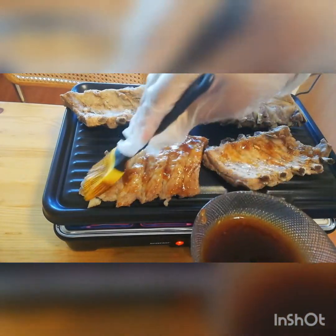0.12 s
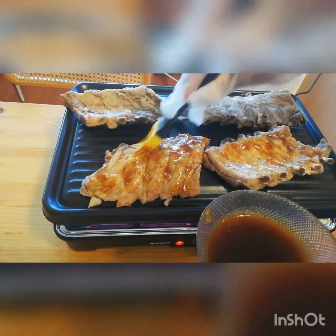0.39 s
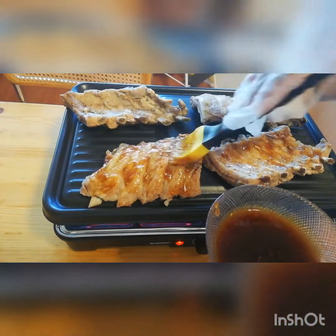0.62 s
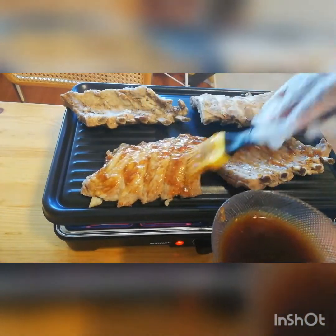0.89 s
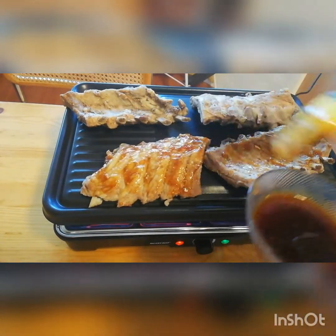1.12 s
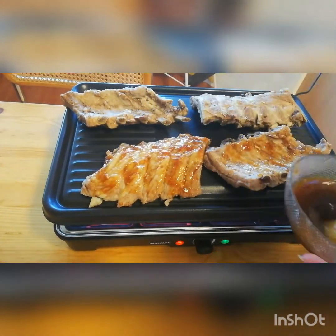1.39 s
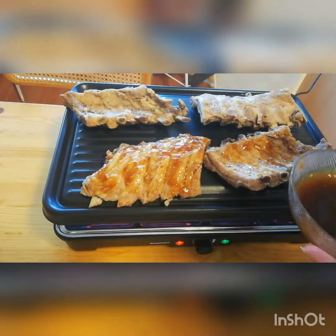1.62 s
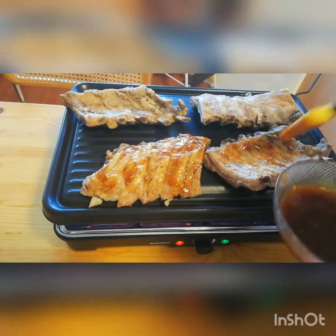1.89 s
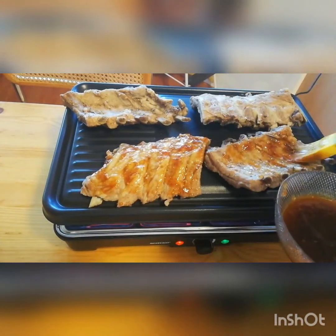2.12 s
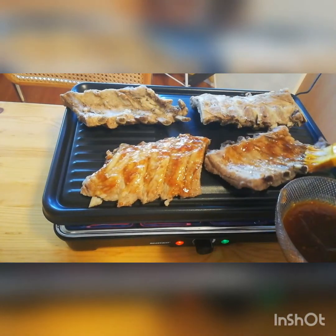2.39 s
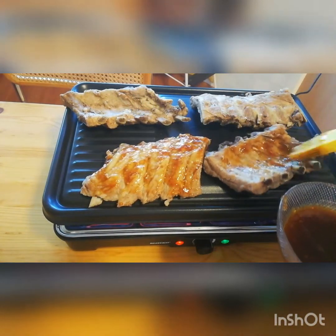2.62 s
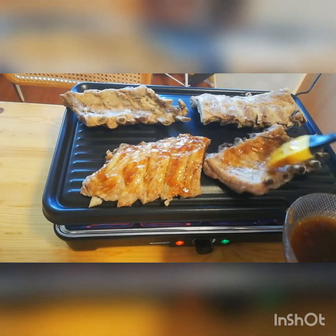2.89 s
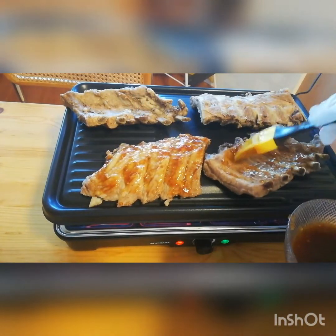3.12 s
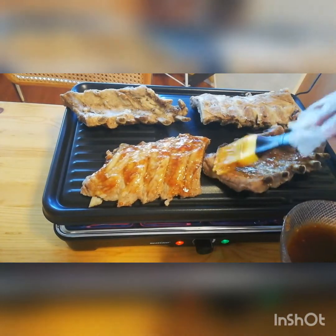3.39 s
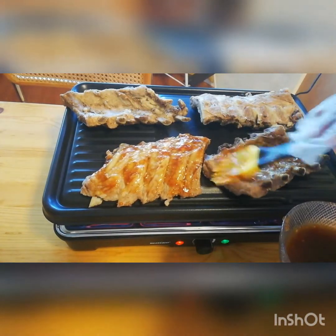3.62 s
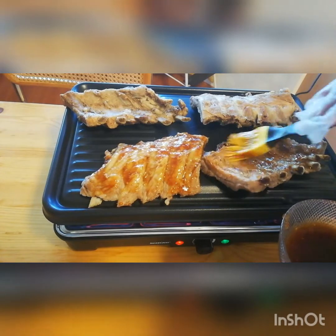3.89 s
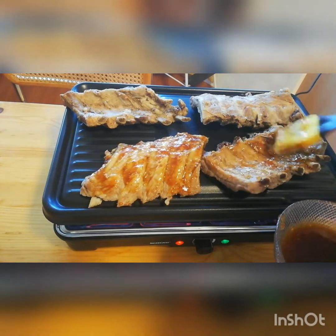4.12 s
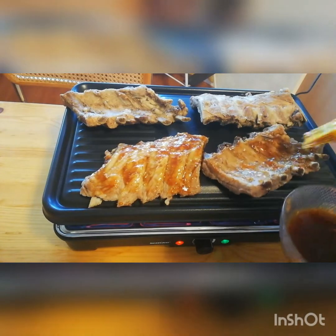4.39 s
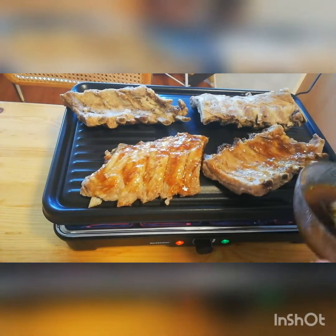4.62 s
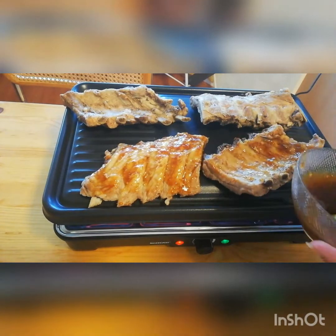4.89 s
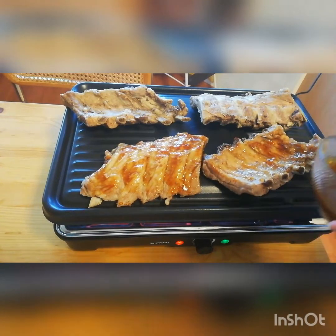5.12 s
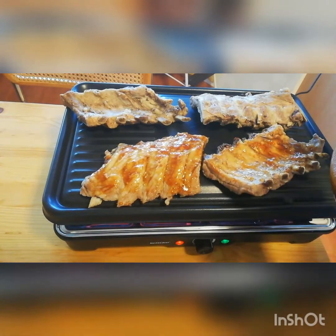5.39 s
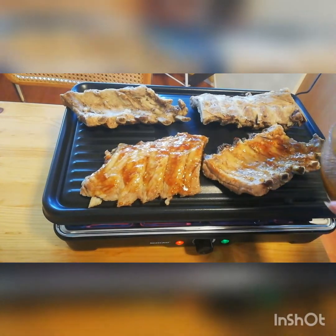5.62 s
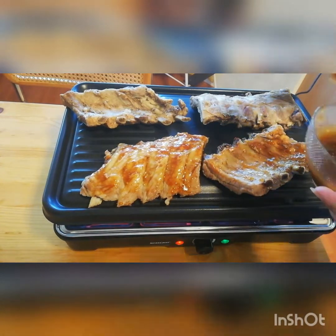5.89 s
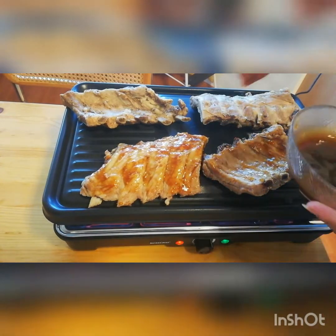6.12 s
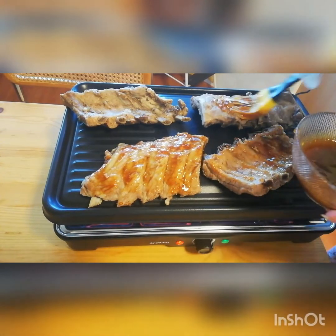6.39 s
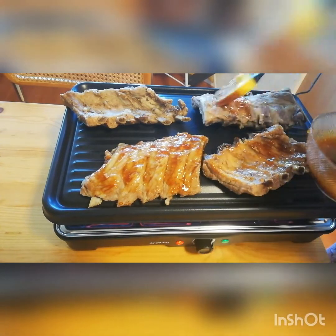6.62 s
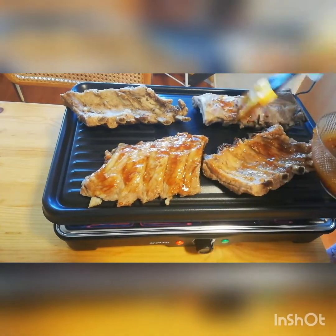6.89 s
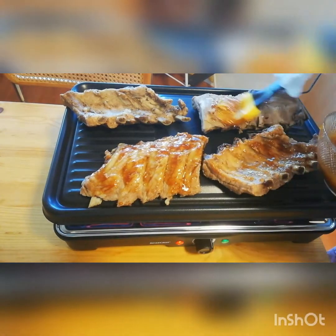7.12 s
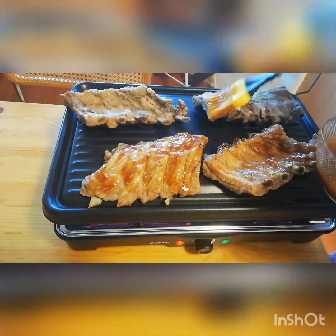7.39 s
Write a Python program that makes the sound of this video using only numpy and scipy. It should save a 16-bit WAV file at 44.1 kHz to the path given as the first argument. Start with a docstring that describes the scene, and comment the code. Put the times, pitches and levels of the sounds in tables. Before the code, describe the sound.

In a small home kitchen, heard in stereo from about half a metre, ribs fry with a bright, fine hiss and random crackle over soft fan noise and barely audible mains hum. Tiny squeaks come at 0.1-0.3 s, and the sizzle surges around 0.4 s with sharp fat pops. A hard, hollow spit snaps at 1.5 s. From 2 s a faint low rumble accompanies the moving bowl; a knock lands at 2.4 s, with pops and spits around it. Between 2.7 and 3.9 s frying flares crowd together, with muffled rubs and a swishy squeak. Around 4-5 s it is calmer, then small pops cluster from 5 s, with a strong one near 5.45 s. Short scrapes follow. From 6.3 s the hiss coarsens, grainy dragging continues, and woody knocks stand out near 6.4, 6.8 and 7.4 s, with squeaks around 7.2 s.

```python
"""Home kitchen, two-port phone half a metre from ribs on a ribbed electric grill plate.
Throughout, steam bubbles burst as coloured noise with random crackle, over shaped fan noise and mains hum.
Early on the hiss flares and fat pops as short filtered noise; near 1.5 s a hard spit rings a hollow.
From 2 s a low rumble, rubs and first knocks, rung from table modes, mark the sauce bowl; flares crowd 3-4 s.
After 5 s pops continue, the bowl and brush scrape as grainy noise, and most knocks come past 6 s."""
import sys
import numpy as np
from scipy import signal
from scipy.fft import rfft, irfft
from scipy.io import wavfile
from scipy.ndimage import uniform_filter1d

SR = 44100
rng = np.random.default_rng(int(sys.argv[2]) if len(sys.argv) > 2 else 0)


def volts(x):
    """Linear amplitude factor 10**(x/20) for a level x in dB, scalar or array-like."""
    e = np.asarray(x, float) / 20
    return 10 ** e


def to_wav(s):
    """Save 16-bit WAV."""
    ch = np.atleast_2d(s).T  # columns
    pcm = np.round(np.clip(ch, -1, 1) * 32767)  # PCM
    wavfile.write(sys.argv[1], SR, pcm.astype(np.int16))


N = 331191
T = np.arange(N) / SR  # seconds

# Levels and peaks are those of the direct sound, before port balance, room and the ports' treble.
# Colour of the fan and the far ribs: pitch_hz, relative_db
KITCHEN_COLOUR = [(12, -44), (20, -1.5), (48, -4), (93, -2.5), (285, 0), (347, -4), (499, -2.5),
                  (558, -7.5), (1000, -1.5), (1710, 0), (2140, -4.5), (2670, -7), (10500, 2), (16000, -80)]
# Wavering mains hum lines: pitch_hz, width_hz, level_db
HUM_LINES = [(100.6, 2.8, -73.5), (281.6, 6.1, -75)]
# Likeness of diffuse sound at the two ports: pitch_hz, correlation (-1 to 1)
PORT_LIKENESS = [(60, .99), (130, .97), (210, .92), (290, .65), (640, .1), (1400, .3), (3000, .05),
                 (15000, 0)]
# One low rumble while the bowl is moved: start_s, length_s, level_db, top_hz
BOWL_SHUDDER = (2, 1.5, -72, 55)
# Muffled rubs while the bowl is handled: start_s, length_s, level_db, centre_hz
BOWL_RUBS = [(2.838, 0.11, -63.5, 228), (3.298, 0.067, -64, 260), (3.446, .05, -63, 350),
             (3.586, 0.097, -66, 304), (4.548, .1, -64, 300), (5.827, 0.065, -52, 437)]
# Something dragged over the table: start_s, length_s, level_db
SCRAPES = [(5.432, 0.075, -56), (5.618, .12, -52.5), (6.41, 0.68, -58.5), (7.108, 0.39, -54.5)]
# Colour of rubbed wood: pitch_hz, relative_db
WOOD_COLOUR = [(500, -36), (850, 5), (1200, 7.5), (1800, 16), (2100, 7), (3500, 10.5), (5000, -38)]
# Thin wavering squeaks and broader swishes: start_s, length_s, first_pitch_hz, level_db, width_hz
SQUEAKS = [(0.115, 0.13, 2810, -61, 30), (0.105, 0.09, 3040, -62, 30), (.255, .065, 2800, -64, 40),
           (.255, .065, 2550, -65, 40), (2.375, .04, 2480, -61, 120), (2.45, .04, 2700, -62, 120),
           (5.55, .07, 1580, -65, 100), (2.87, .2, 2790, -57.5, 500), (3.019, .12, 3890, -58, 1500),
           (5.37, 0.07, 1580, -64, 100), (7.168, .16, 865, -57, 50), (7.13, 0.133, 1645, -63, 250),
           (7.2, 0.11, 2020, -59, 80), (7.2, .07, 1470, -61, 80)]
# Bowl and brush handle on the table: start_s, peak_db, body_hz, contact_ms (crest of the rattle's swell)
TABLE_KNOCKS = [(2.396, -26, 690, 1.33), (2.877, -45, 520, 3.5), (5.866, -47, 600, 6.4),
                (6.384, -29, 1010, 1.5), (6.672, -44, 1600, 1.1), (6.791, -24.5, 1180, 1.7),
                (6.928, -41, 860, 2.34), (7.133, -45, 424, 2.54), (7.362, -35, 800, 5),
                (7.407, -25, 860, 0.9)]
# Ringing modes of the table: pitch_hz, level_db, t60_s
TABLE_MODES = [(237, -2, .09), (392, 0, .09), (475, -6, .04), (550, -5, .04), (735, -2, .05),
               (855, -2, .06), (970, -3, .04), (1112, -2, .045), (1260, -3, .035), (1390, -3, .045),
               (1580, -4, .04), (1820, -5, .06), (2010, -9, .03)]
# Resonances of heavy spits of fat; rows at nearly the same time sound as one spit:
# start_s, peak_db, hollow_hz, t60_s
SPIT_RESONANCES = [(0.082, -44, 2700, 0.011), (0.351, -32, 1700, 0.011), (0.35, -40, 2700, .006),
                   (.351, -29, 4600, 0.0065), (.4, -37.5, 1620, 0.008), (.4, -45, 2900, .006),
                   (.4, -29.5, 4500, 0.007), (1.4768, -18.5, 2950, 0.004), (1.4768, -15, 3700, 0.004),
                   (1.4768, -23, 4700, .003), (1.477, -34, 1600, .005), (1.476, -40, 860, 0.01),
                   (2.1749, -37.5, 1720, 0.0039), (2.247, -26, 1760, 0.019), (2.248, -26.5, 3400, 0.0098),
                   (2.247, -25, 4320, 0.011), (3.055, -38, 3130, 0.0048), (3.858, -39, 2890, 0.02),
                   (3.859, -37, 4130, .01), (5.0152, -39.5, 3140, 0.0074), (5.445, -37, 4260, 0.12),
                   (5.445, -39, 1430, 0.0021), (5.447, -31, 5750, 0.0061), (5.455, -30, 5470, .02),
                   (5.456, -44, 3280, 0.03), (6.3133, -32, 2810, 0.00095)]
# Hollow between meat and plate: pitch_ratio, level_db, t60_share (parts of the resonance's own values)
HOLLOW_MODES = [(.55, -20, 0.3), (1, 3, 1)]
# Single pops: start_s, peak_db, bubble_hz
FAT_POPS = [(.006, -31.5, 9060), (0.08, -33, 8650), (0.2448, -31, 8260), (0.2897, -37, 8360),
            (0.3502, -23.5, 11000), (0.399, -24.5, 7840), (1.477, -21, 10100), (2.1747, -29.5, 8400),
            (2.247, -23, 11100), (2.3243, -24, 7500), (2.415, -34, 7000), (2.6865, -34, 7660),
            (2.8757, -33, 10400), (2.9066, -31.5, 11400), (3.02, -31, 8250), (3.043, -30, 7800),
            (3.209, -28.5, 10100), (3.271, -20.5, 10200), (3.799, -31, 8500), (3.861, -22.5, 11300),
            (4.626, -29.5, 10000), (4.9684, -36, 9800), (5.001, -30.5, 9400), (5.0137, -33, 9400),
            (5.0502, -30, 9200), (5.073, -34, 9400), (5.121, -36, 10100), (5.127, -35.5, 9000),
            (5.189, -38, 8750), (5.3186, -37, 8700), (5.388, -36.5, 8900), (5.445, -20, 9200),
            (5.51, -30, 9300), (5.546, -24, 9700), (5.784, -33, 9950), (6.1533, -30.5, 8900),
            (6.311, -28, 7240), (6.436, -35, 7390), (6.917, -27, 7900), (7.348, -29, 9700)]
# Steady frying: time_s, vigour_db, coarseness_db, left_minus_right_db
STEADY_FRYING = [(0, -62.5, 2, -5.5), (.4, -50, 2, 0.5), (1.3, -55, -1, -5.5), (2.2, -58.5, 2, -4.5),
                 (3.0, -57.5, -0.5, -2.5), (3.9, -59, -2.5, -7), (5.5, -58.5, -4, -1), (6.27, -55, 6, -7),
                 (7.51, -52.5, 4, -7)]
# Flares of frying: crest_s, vigour_db, rise_s, fall_s, large_bubble_share (0 to 1.5)
FRYING_FLARES = [(.091, -51, 0.027, 0.023, 0.5), (.37, -42, 0.065, 0.21, 0.95),
                 (1.49, -47, 0.01, 0.034, 1.4), (2.258, -53.5, 0.014, .05, 1.2),
                 (2.339, -49, 0.018, 0.053, 0.9), (2.428, -46, 0.014, 0.011, 1),
                 (2.513, -53, 0.017, 0.056, 0.7), (2.705, -49, 0.071, 0.24, 0.3),
                 (2.889, -48.5, 0.049, 0.059, 0.6), (3.037, -44.5, 0.017, 0.064, 0.94),
                 (3.12, -45, 0.077, 0.014, 0.95), (3.272, -44, 0.076, 0.12, 0.5),
                 (3.409, -43, 0.017, 0.024, 0.55), (3.711, -43, 0.045, 0.063, 0.52),
                 (3.867, -39.5, 0.005, 0.045, 0.2), (4.641, -52, 0.032, 0.18, 1),
                 (4.859, -52, 0.029, 0.07, 0.5), (5.063, -52.5, 0.13, 0.038, 0.8),
                 (5.133, -50, 0.018, 0.043, 1), (5.455, -51, 0.0095, 0.6, 1), (5.794, -53, 0.025, 0.04, 1)]
# Colour of the small bubbles: pitch_hz, relative_db
SMALL_COLOUR = [(6000, -27.5), (7600, -3), (8300, -2.5), (9200, -4), (10600, -1), (11400, -2.5),
                (12500, -10), (15600, -20), (16000, -71)]
# Colour of the middle bubbles: pitch_hz, relative_db
MIDDLE_COLOUR = [(4300, -10), (5300, 5), (6600, 5), (7400, 0.5), (8500, -77)]
# Colour of the large bubbles: pitch_hz, relative_db
LARGE_COLOUR = [(1900, -43), (2400, 1), (2900, 8.5), (3700, 7), (4400, 7.5), (5500, -1)]


def colour(x, points):
    """Shape a sound's spectrum by (Hz, dB) points; unit rms out."""
    hz, db = np.transpose(points)
    log_hz = np.log(np.arange(N // 2 + 1) * SR / N + 1)
    y = irfft(rfft(x) * volts(np.interp(log_hz, np.log(hz), db)), N)
    return y / np.sqrt(np.mean(y ** 2))


def band(x, hz, width):
    """One resonance, gain 1 at its centre."""
    return signal.lfilter(*signal.iirpeak(hz, hz / width, SR), x)


def ring(x, modes):
    """A blow rings a set of decaying modes, each a complex one-pole resonator."""
    out = 0
    for hz, db, t60 in modes:
        pole = np.exp(2j * np.pi * hz / SR - np.log(1000) / (t60 * SR))
        out = out + volts(db) * signal.lfilter([1], [1, -pole], x).imag
    return out


def peak(x, db):
    """Set the highest sample."""
    return x * volts(db) / np.max(np.abs(x))


def add(out, s, sound):
    """Place a sound at a time in seconds."""
    i = int(s * SR)
    out[:, i:i + sound.shape[1]] += sound[:, :N - i]


def sides(pan_db):
    """Left and right gains for a left-minus-right level difference."""
    return volts(np.array([pan_db, -pan_db]) / 2)


def stroke(s, length):
    """Gain of one stroke: swell, hold, fade."""
    edge_s = 0.048
    return np.clip(np.minimum(T - s, s + length - T) / edge_s + .5, 0, 1)


def diffuse():
    """Sound from all around: two noises, alike in the bass and unrelated in the treble."""
    hz, likeness = np.transpose(PORT_LIKENESS)
    log_hz = np.log(np.arange(N // 2 + 1) * SR / N + 1)
    c = np.clip(np.interp(log_hz, np.log(hz), likeness), -1, 1)
    mid, side = rfft(rng.standard_normal((2, N))) * np.sqrt([1 + c, 1 - c])
    return irfft([mid + side, mid - side], N) / 2


def impulses(per_s, spread_db):
    """Impulses at random moments; most are small, a few large."""
    chance = rng.random((2, N))
    size = volts(np.minimum(-spread_db * np.log(1 - chance[1]), 17))  # at most 17 dB above the least
    return (chance[0] < per_s / SR) * size


def crackle(per_s, decay_ms, level):
    """Each impulse starts a short decaying puff of noise, a different noise at each port."""
    decay = np.exp(-1000 / (decay_ms * SR))
    puffs = signal.lfilter([1], [1, -decay], impulses(per_s, spread_db=3.2))
    sound = puffs * rng.standard_normal((2, N))
    return level * sound / np.std(sound)


def noise_burst(scale_ms):
    """Short noise burst with a rounded rise and fall, partly different at the two ports."""
    t = 1000 * T[:4096] / scale_ms
    noise = rng.standard_normal((3, len(t)))
    return (noise[:2] + 1.47 * noise[2]) * t * np.exp(-t ** 2 / 10.7)  # crest at 2.3 scale_ms


def room(dry, wet_db):
    """Kitchen walls: a decaying noise tail for each port, treble dying first, added to the direct sound."""
    low_t60_s, treble_t60_s = 0.37, 0.039
    t = T[:SR // 2]
    noise = diffuse()[:, :len(t)]
    low = signal.lfilter([.42], [1, -.58], noise)
    tail = low * volts(-60 * t / low_t60_s) + (noise - low) * volts(-60 * t / treble_t60_s)
    tail = tail * np.clip((t - .004) / .006, 0, 1)  # silent for 4 ms, full at 10 ms
    tail = tail / np.sqrt(np.sum(tail ** 2) / 2)
    return dry + volts(wet_db) * signal.fftconvolve(dry.mean(axis=0)[None], tail, axes=1)[:, :N]


def kitchen():
    """Fan rumble and the far ribs' steady hiss as shaped noise; hum lines as narrow bands of noise."""
    out = volts(-54.5) * colour(diffuse(), KITCHEN_COLOUR)
    for hz, width, db in HUM_LINES:
        line = band(rng.standard_normal(N), hz, width)
        out = out + volts(db) * line / np.std(line)
    return out


def shudder():
    """A faint low rumble while the bowl is moved: low-band noise, the same at both ports."""
    s, length, db, top_hz = BOWL_SHUDDER
    bass = signal.butter(2, [20, top_hz], "band", fs=SR, output="sos")
    low = signal.sosfilt(bass, rng.standard_normal(N))
    return volts(db) * low / np.std(low) * stroke(s, length)


def rubs():
    """Dull uneven rubbing of the bowl: noise and slow crackle through a broad low resonance."""
    noise, out = diffuse() + crackle(120, 8.0, 0.72), 0
    for s, length, db, hz in BOWL_RUBS:
        rub = band(band(noise, hz, 0.96 * hz), hz, 0.96 * hz)
        out = out + volts(db) * rub / np.std(rub) * stroke(s, length)
    return out


def scrape():
    """Rough sliding contact: grainy noise in the broad colour of wood."""
    rub = colour(diffuse() + crackle(370, 0.49, 0.2), WOOD_COLOUR)
    return rub * sum(volts(db) * stroke(s, length) for s, length, db in SCRAPES)


def whistle():
    """Rough narrow tones: slow noise carried on a sagging pitch."""
    sag = 0.008  # share of its pitch that a squeak loses
    steady_hz = 35  # the narrower a squeak against this, the clearer its tone
    out = 0
    for s, length, hz, db, width in SQUEAKS:
        pitch_hz = hz * (1 - sag * np.clip((T - s) / length, 0, 1))
        phase = 2 * np.pi * np.cumsum(pitch_hz) / SR
        waver = uniform_filter1d(rng.standard_normal((2, 2, N)), int(SR / width))
        steady = steady_hz / width * np.std(waver)
        tone = (waver[0] + steady) * np.cos(phase) + waver[1] * np.sin(phase)
        out = out + volts(db) * tone / np.std(tone) * stroke(s, length)
    return out


def knocks():
    """A rattle, with a sharp push if contact is short, rings the table; a broad band picks its modes."""
    bounce_ms, bounce = 1.874, 0.38  # a second touch, this much later and at this gain
    blur_db, blur_t60_s = -7, 0.21  # many close modes blur into a noisy tail
    out = np.zeros((2, N))
    t, grain = T[:SR // 4], diffuse()
    dull = signal.butter(3, 2200, fs=SR, output="sos")  # the wood rings little above this
    for s, db, hz, ms in TABLE_KNOCKS:
        noise = np.roll(grain, rng.integers(N), axis=1)
        rattle = t * np.exp(-1000 * t / ms) * noise[:, :len(t)]
        push = t * np.exp(-t / 0.00005) / 0.00004 * (ms < 2.5)
        blow = 0.47 * rattle / np.max(np.abs(rattle)) + push
        blow = blow + bounce * np.roll(blow, int(bounce_ms * SR / 1000), axis=1)
        modes = ring(blow, TABLE_MODES)
        blur = signal.sosfilt(dull, noise[:, -len(t):])
        blur = blur * volts(-60 * t / blur_t60_s) * np.clip(t / .003, 0, 1)
        modes, blur = [band(band(x, hz, 1.5 * hz), hz, 1.5 * hz) for x in (modes, blur)]
        thud = peak(peak(modes, 0) + peak(blur, blur_db), db)
        add(out, s, sides(-1.7)[:, None] * thud)
    return out


def spits():
    """Short noise bursts ring resonances of the hollow under the meat, reaching the left port later."""
    port_lag = 4  # samples
    out = np.zeros((2, N))
    for s, db, hz, t60 in SPIT_RESONANCES:
        modes = [(hz * ratio, mode_db, t60 * share) for ratio, mode_db, share in HOLLOW_MODES]
        burst = noise_burst(1000 * 1.12 / hz)  # time scale of 1.12 cycles of the hollow
        rung = ring(burst, modes)
        left, right = peak(band(band(rung, hz, hz), hz, hz), db)
        add(out, s, sides(-0.4)[:, None] * np.array([np.roll(left, port_lag), right]))
    return out


def pops():
    """A pop is a short noise burst filtered around its bubble pitch, with a little broad crack."""
    out = np.zeros((2, N))
    pan_s, pan_db = np.transpose(STEADY_FRYING)[[0, 3]]
    for s, db, hz in FAT_POPS:
        burst = noise_burst(0.76)
        crack = band(band(burst, 9000, 5600), 6700, 7400)
        sound = 0.89 * band(burst, hz, 0.21 * hz) + 0.082 * crack
        add(out, s, sides(np.interp(s, pan_s, pan_db))[:, None] * peak(sound, db))
    return out


def flutter():
    """Slow random level changes: dB offsets at a steady rate, joined by straight lines."""
    spread_db, per_s = 1.5, 14
    steps = np.arange(0, N / SR + 1, 1 / per_s)
    return spread_db * np.interp(T, steps, rng.standard_normal(len(steps)))


def sizzle():
    """A smooth hiss of countless bubbles and a crackle of louder ones that grows faster with vigour."""
    s, *controls = np.transpose(STEADY_FRYING)
    simmer_db, coarse_db, pan_db = (np.interp(T, s, c) for c in controls)
    power, joined = volts(2 * simmer_db), 0  # amp of twice the dB is power
    for s, db, rise, fall, share in FRYING_FLARES:
        flare = volts(2 * db) * np.exp(-2 * np.abs(T - s) / np.where(T < s, rise, fall))
        power = power + flare
        joined = joined + share * flare
    vigour_db = 10 * np.log10(power)
    flare_db = vigour_db - np.mean(vigour_db)

    fine = crackle(500, 1.0, volts(-8.5 + 0.19 * flare_db))
    coarse = crackle(300, 0.99, volts(-7.5 + 0.089 * flare_db))
    small = colour(diffuse() + fine, SMALL_COLOUR)
    small = volts(vigour_db + flutter()) * small
    middle = colour(diffuse() + 0.3 * fine + coarse, MIDDLE_COLOUR)
    middle = volts(-58.5 + flutter() + coarse_db + 0.66 * flare_db) * middle
    # large bubbles follow each flare only by its share
    large_db = -60 + 0.76 * coarse_db + joined / power * (vigour_db - simmer_db)
    large = colour(diffuse() + 1.02 * coarse + 1.3 * fine, LARGE_COLOUR)
    large = volts(large_db + flutter()) * large
    return sides(pan_db) * small + sides(pan_db + 6) * middle + large


def scene():
    """Frying, squeaks, fat and knocks echo in the kitchen; the other layers are added without echo."""
    frying = room(sizzle() + whistle(), -8.0)
    hits = room(pops() + spits(), -10.5) + room(knocks(), -12)
    return frying + hits + scrape() + rubs() + kitchen() + shudder()


def roll_off(x):
    """The treble ends steeply here."""
    return signal.sosfilt(signal.butter(12, 16820, fs=SR, output="sos"), x)


def record(dry):
    """The phone's right port faces the grill and hears more treble; the top is cut at 15.9 kHz."""
    treble = signal.sosfilt(signal.butter(2, 6500, "high", fs=SR, output="sos"), dry)
    ports = dry + np.array([[-.3], [.3]]) * treble
    ports = signal.sosfilt(signal.ellip(8, .3, 30, 15900, fs=SR, output="sos"), ports)
    return roll_off(ports)


dry = scene()
out = record(dry)
to_wav(out)
```